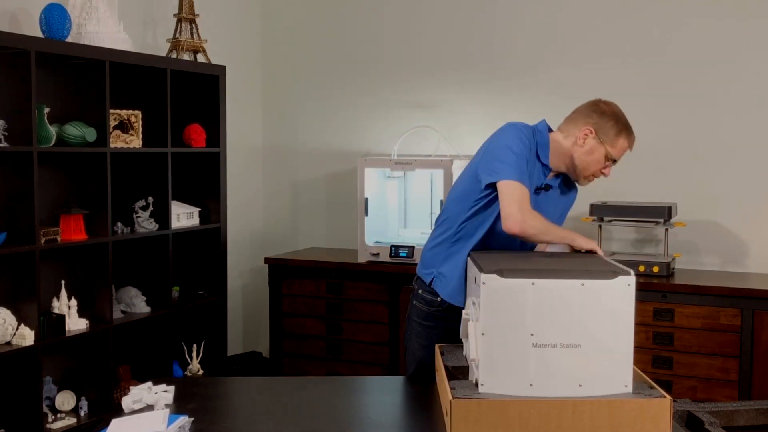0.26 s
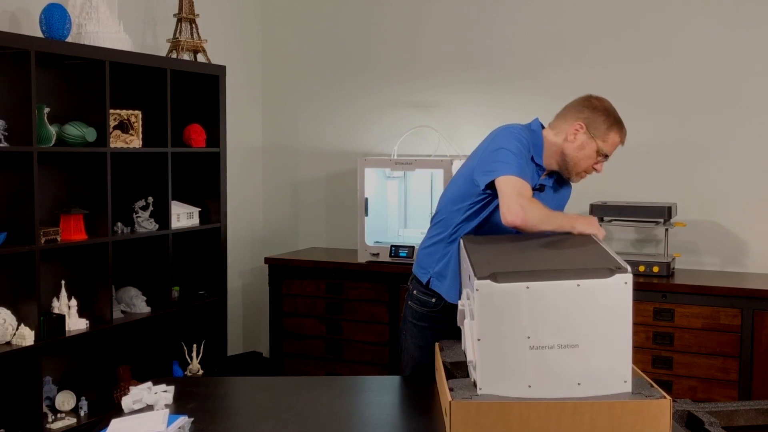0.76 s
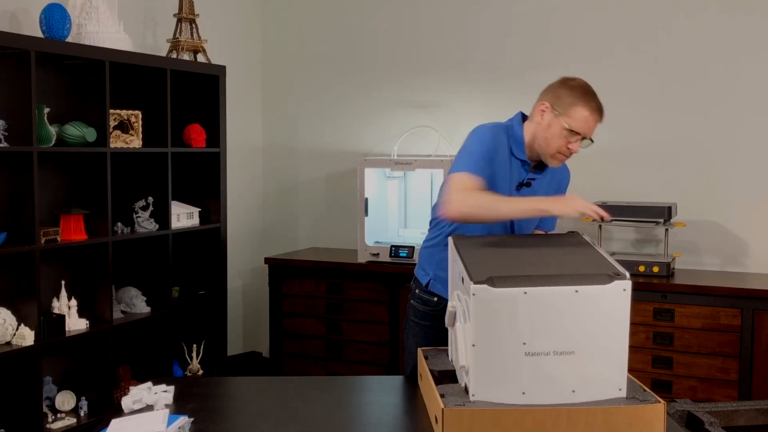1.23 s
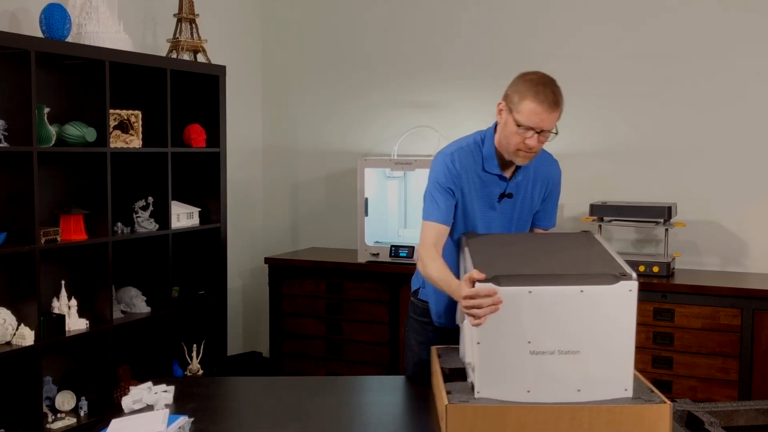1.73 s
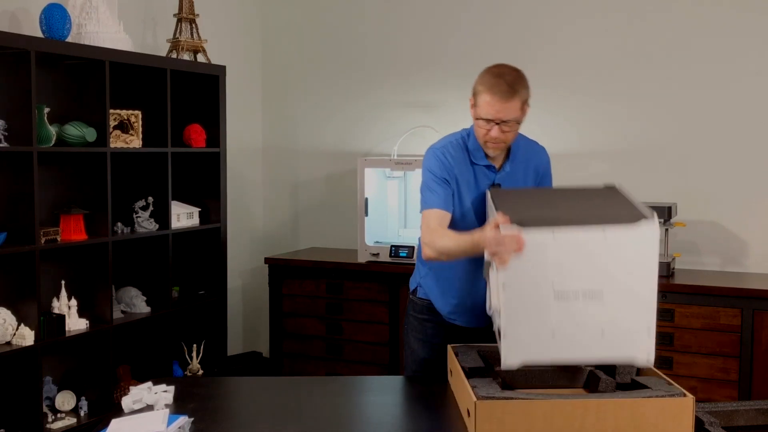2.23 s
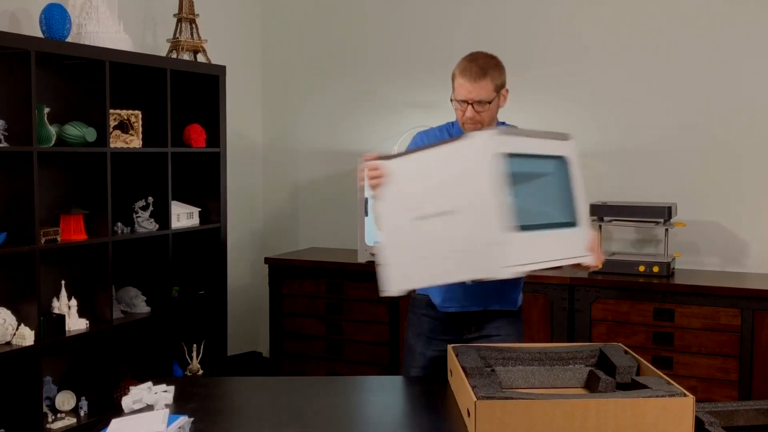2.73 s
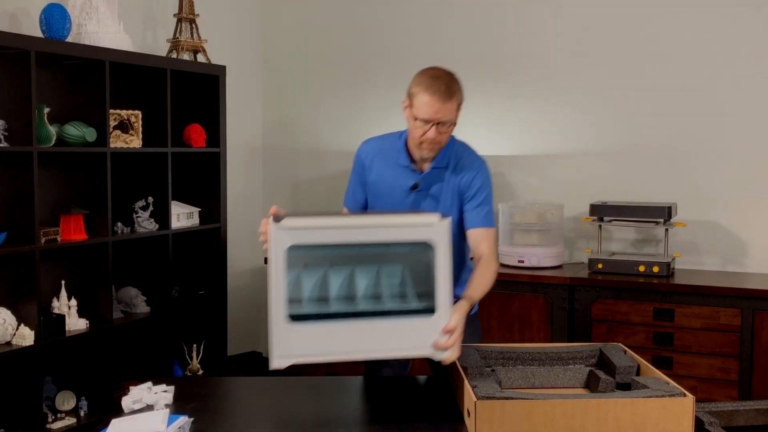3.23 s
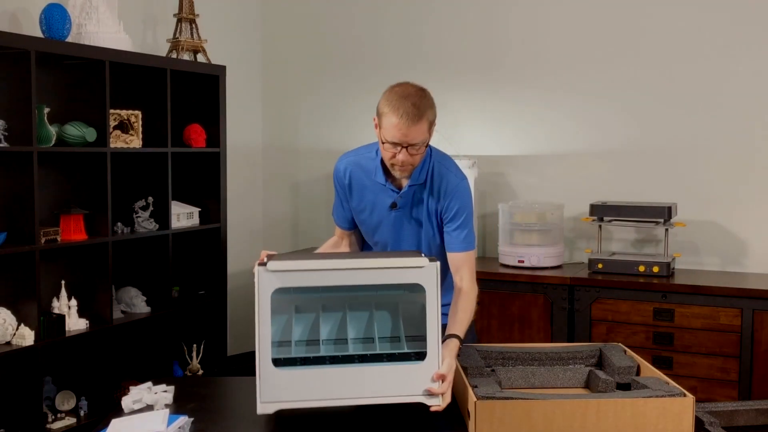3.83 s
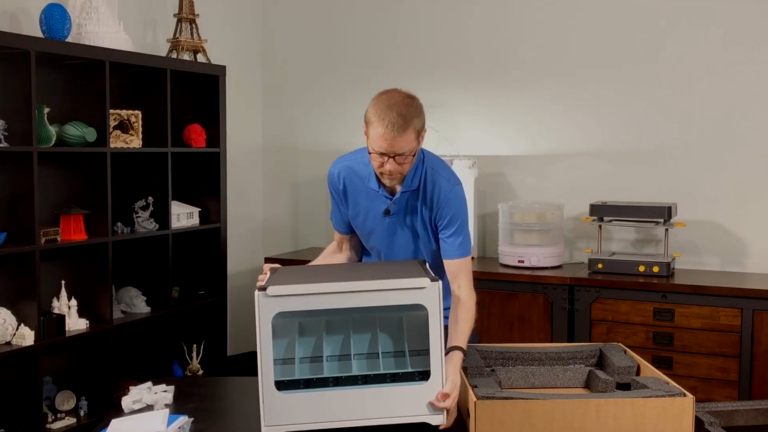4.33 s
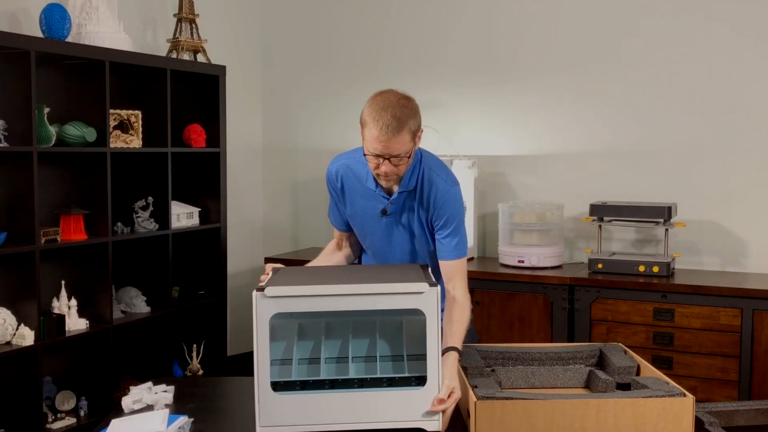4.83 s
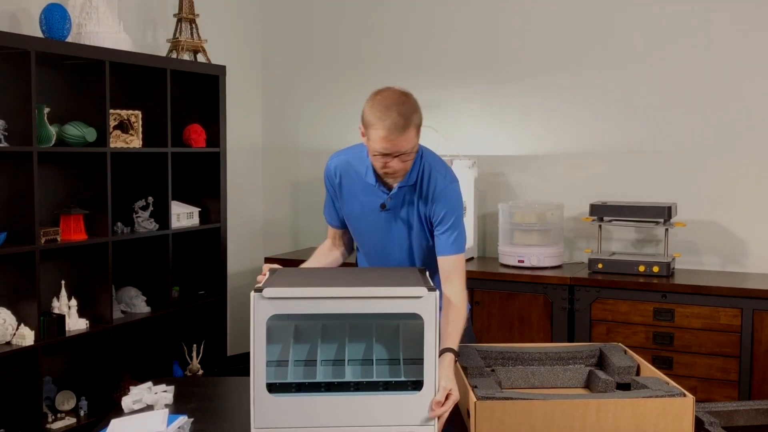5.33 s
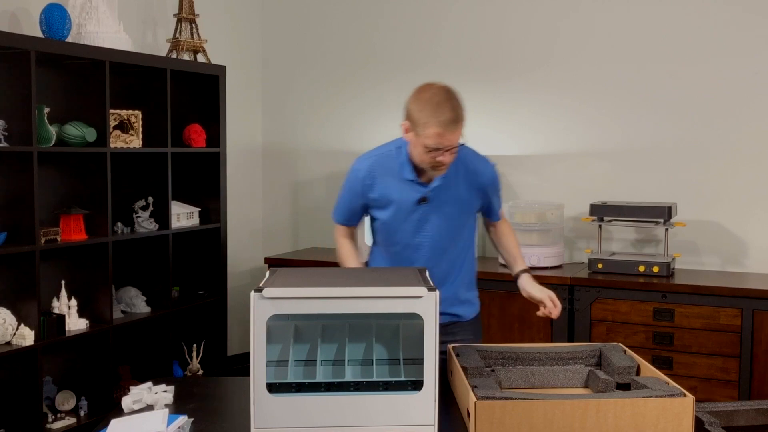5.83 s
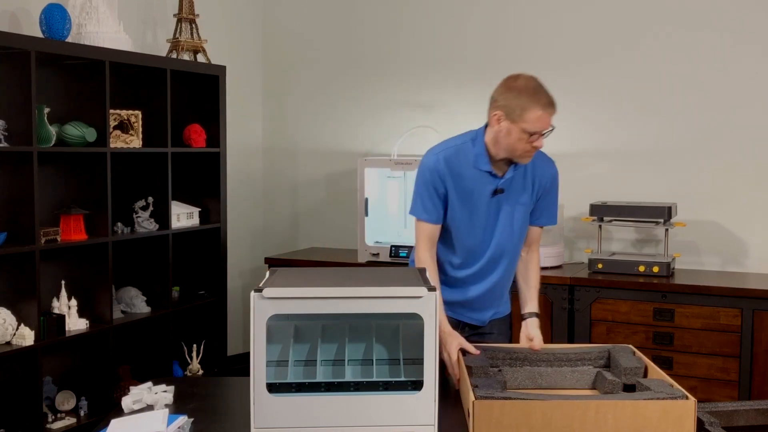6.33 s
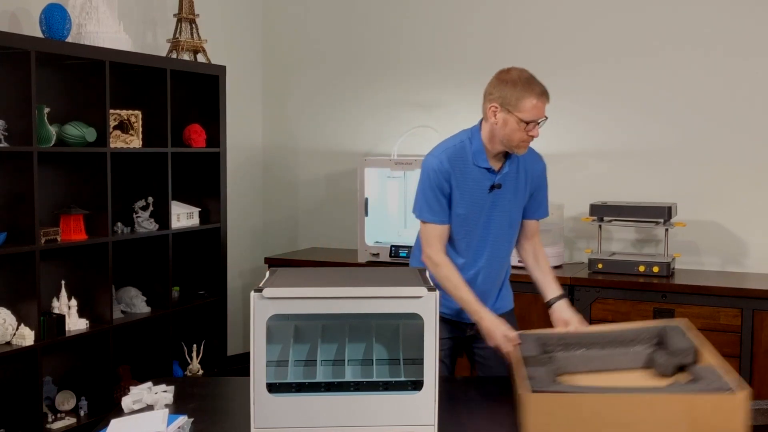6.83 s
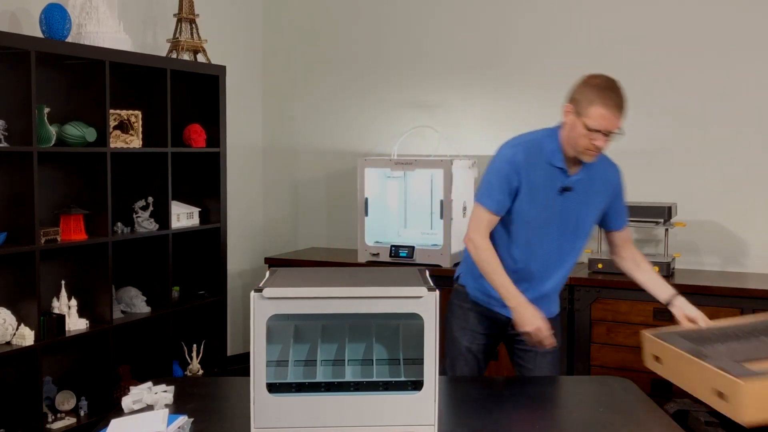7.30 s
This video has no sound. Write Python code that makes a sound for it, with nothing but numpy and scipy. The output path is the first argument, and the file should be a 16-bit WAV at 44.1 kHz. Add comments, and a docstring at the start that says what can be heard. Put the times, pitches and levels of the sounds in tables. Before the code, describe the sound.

For the first 1.5 seconds a hand sweeps over the lid of a heavy plastic and metal cabinet, with a few dry snaps. From about 1.7 seconds the cabinet slides out of foam packing, coming free with soft knocks and a deep microphone bump at 2.3. It scrapes the cardboard rim with a short squeak at 2.6, followed by a sharp click. Cloth rustles and the shirt microphone rumbles as it is carried. At 4.3 seconds it lands on a table with a hollow thump and rocks briefly; after a short slide, a sharper, louder thump follows at 5. Clothing rustles again. From 6.1 to 7 seconds the empty carton is dragged across the table with light taps and crisp snaps, then put down with a hollow knock at 7.5. The room is small and quiet, and the sound is close, with a slight fluttering echo.

```python
"""A heavy plastic and metal cabinet is unpacked in a small room, heard from a microphone on a shirt.
First a hand sweeps the lid; then the cabinet slides out of its foam and scrapes the carton's rim, all
by stick-slip friction. It is carried over and set on a table in two steps, whose impacts excite the
modes of its panels. Last, the hollow carton is dragged off and put down. Throughout, the shirt shakes
the microphone into a rumble, and the echoes of a hum filter add a short flutter."""
import sys
import numpy as np
from scipy import signal
from scipy.fft import rfft, irfft, next_fast_len
from scipy.io import wavfile
from scipy.ndimage import uniform_filter1d

SR = 44100
rng = np.random.default_rng(int(sys.argv[2]) if len(sys.argv) > 2 else 0)


def dump(signal):
    """Clip the signal to [-1, 1] and save it as 16-bit WAV at the path in sys.argv[1]."""
    limited = np.clip(np.atleast_2d(signal).T, -1, 1)
    pcm = np.round(limited * 32767).astype(np.int16)
    wavfile.write(sys.argv[1], SR, pcm)


N = 333306
T = np.arange(N) / SR

# Blows as the cabinet comes free, lands and rocks. Each row: start in seconds, level in dB,
# contact cut-off in Hz, relative levels of dense ringing and of table boom in dB.
CABINET_BLOWS = [(2.284, -25, 1000, -2, -22), (2.326, -26.5, 1000, 2, -30), (2.992, -36.5, 1800, 1.5, -33),
                 (3.055, -38, 1500, -12, -30), (4.341, -8.5, 1300, -2, -6), (4.378, -26.5, 700, 0, 6),
                 (4.415, -23, 1100, 9, -12), (4.508, -12, 380, -0.5, -11), (4.55, -21, 220, 5.5, 2.5),
                 (4.593, -23, 304, 4, 5.5), (5.012, -0.5, 5950, -0.5, -22), (5.055, -14.5, 2480, 7.5, -7),
                 (5.124, -7.5, 252, -3.5, -7), (5.165, -14, 147, -11, -13)]
# Modes of the cabinet and the empty carton. Each row: frequency in Hz, level in dB, T60 in seconds.
PANEL_MODES = [(108.4, -7, 0.51), (142.7, -19, 0.33), (182.6, -17, 1), (214.7, -11.5, 0.18),
               (290, -25, 0.38), (314, -22, 0.75), (354.5, -11, 0.28), (390, -23.5, .3), (426, -23, 0.16),
               (450, -27, 0.19), (560, -24.5, 0.24), (632.5, -26.5, 0.26), (678, -11, 0.25),
               (799, -11.5, 0.1), (1002, -22.5, 0.4), (1190, -22.5, 0.44), (1460, -29, 0.2)]
CARTON_MODES = [(100.5, -23, 0.22), (164.6, -17, 0.21), (201, -20.5, 0.48), (297, -17.5, 0.102),
                (377, -11, 0.056), (552, -7, 0.026), (569, -21, 0.24), (630, -10.5, 0.016),
                (770, -18, 0.053), (850, -16.5, 0.032)]
# Decay of the cabinet's and room's overlapping modes. Each row: frequency in Hz, T60 in seconds.
DENSE_T60 = [(50, 0.46), (200, 0.52), (500, 0.49), (2000, 0.5), (6000, 0.58), (14000, 0.38)]
# Taps on the carton. Each row: start in seconds, level in dB.
CARTON_TAPS = [(2.221, -30), (6.134, -31), (6.274, -30.5), (6.31, -34.5), (7.011, -34), (7.385, -34),
               (7.5051, -13), (7.522, -31)]

# Sliding strokes. Each row: time of full speed, attack, hold and release in seconds,
# level of the panel's drone in dB, level of the surface grit in dB.
HAND_STROKES = [(0.0, 0.15, 0.23, .3, -65.5, -70.5), (0.33, 0.14, 0.12, 0.054, -61, -63),
                (0.497, 0.11, 0.375, 0.11, -50.5, -52), (0.878, 0.027, 0.28, 0.27, -46, -43.5),
                (1.475, 0.02, 0.024, 0.18, -60.5, -84)]
FOAM_STROKES = [(1.74, 0.28, .4, 0.26, -52, -45), (1.97, 0.18, 0.11, 0.29, -54.5, -49)]
FEET_STROKES = [(4.88, 0.13, .13, 0.026, -49, -62), (4.96, 0.18, 0.044, 0.025, -49.5, -53.5)]   # the cabinet's feet, before the second step
CARTON_STROKES = [(6.097, .015, 0.23, 0.14, -63, -58), (6.28, 0.17, .13, 0.16, -49.5, -47),
                  (6.48, 0.089, 0.18, .25, -51.5, -43.5), (6.64, 0.39, 0.3, 0.24, -54, -47),
                  (6.79, 0.12, 0.029, 0.081, -42.5, -40), (7.014, 0.0092, 0.0046, 0.065, -44.5, -54)]   # gripped, dragged, pulled faster, tipped over the edge, let slip
SHIRT_STROKES = [(2.76, 0.036, 0.077, 0.41, -62.5, -56.5), (3.005, .015, 0.018, 0.15, -48.5, -73),
                 (3.378, 0.022, 0.0086, .15, -60, -57), (3.88, .1, 0.16, 0.091, -72.5, -69.5),
                 (4.09, .04, 0.016, 0.058, -64.5, -74), (5.432, 0.014, 0.023, 0.23, -55, -53.5),
                 (5.55, 0.059, 0.023, 0.41, -72, -58.5), (5.95, .12, 0.017, .07, -64.5, -69),
                 (7.44, 0.12, 0.15, .1, -59, -61)]

# Noise spectra. Each row: frequency in Hz, relative spectral density in dB.
DENSE_SPECTRUM = [(30, -7), (70, 5.5), (130, 3.5), (300, -0.5), (480, -7), (800, -11.5), (1500, -15.5),
                  (2300, -17.5), (3200, -22.5), (5000, -26.5), (7700, -31), (10000, -39.5), (16000, -52.5)]   # overlapping modes
HAND_SPECTRUM = [(110, -2), (180, -2.5), (230, -10), (299, -4.5), (334, -1.5), (419, -3), (566, -4.5),
                 (750, -7), (957, -7.5), (1270, -17.5), (3240, -13.5), (8450, -18.5), (13500, -29),
                 (16000, -35)]   # hand on lid
FOAM_SPECTRUM = [(110, -45), (180, 6), (209, -3), (443, 7), (736, -2.5), (808, -0.5), (1050, -6),
                 (1270, -7.5), (1530, -11), (6870, -12.5), (13300, -23.5), (16000, -39)]   # foam on cabinet
FEET_SPECTRUM = [(88, -22.5), (150, -1), (197, -11), (259, -4), (303, -5.5), (612, -7), (689, -6),
                 (1290, -14), (4410, -13), (16000, -37)]   # feet on table
CARTON_SPECTRUM = [(82, -36), (140, -29), (200, -2.5), (244, -6.5), (377, -1.5), (469, -2), (770, -1),
                   (921, -7.5), (1170, -11), (1570, -8), (2970, -7), (5070, -4), (9370, -7.5),
                   (16000, -22.5)]   # carton on table
SHIRT_SPECTRUM = [(120, -36), (200, -0.5), (416, -5), (558, -6), (1000, -14.5), (1140, -16.5), (3560, -7),
                  (5520, -5.5), (10100, -9), (16000, -25)]   # cloth on arms and cabinet
SCRAPE_SPECTRUM = [(53, -37.5), (90, 7.5), (192, -9), (233, 0), (300, -6), (348, -8), (395, -6.5),
                   (744, -3.5), (862, -7.5), (1130, -7), (1690, -15.5), (2230, -12.5), (2870, -20),
                   (5190, -20), (14000, -60)]   # cabinet on the carton's rim
RUMBLE_SPECTRUM = [(8.2, -22), (14, 3.5), (27, 2), (39, -7), (52, -9), (90, -33.5), (123, -54),
                   (260, -61.5), (340, -71), (570, -120)]   # shaken microphone
AIR_SPECTRUM = [(15, -25), (25, 3), (49, -4), (123, -15), (326, -28.5), (575, -40.5), (695, -38.5),
                (1290, -42.5), (6740, -39), (9570, -41.5), (14800, -48.5), (16000, -49)]   # quiet room

# Card, foam and cloth singing as they slip. Each row: peak time and half-length in seconds,
# frequency and bandwidth in Hz, level in dB.
SQUEAKS = [(0.506, 0.044, 630, 150, -48.5), (0.901, 0.021, 3350, 1600, -40),
           (1.198, 0.012, 2850, 900, -42.5), (1.84, .05, 8000, 2500, -52),
           (2.099, 0.049, 5200, 3540, -42.5), (2.557, 0.033, 950, 600, -32), (2.586, .016, 1160, 60, -22.5),
           (2.86, 0.039, 5400, 1400, -54.5), (6.789, 0.017, 778, 119, -38.5),
           (6.855, 0.055, 8400, 6600, -40)]
# Dry snaps of plastic and card. Each row: start in seconds, peak level in dB,
# frequency and bandwidth in Hz, T60 in seconds.
SNAPS = [(0.4963, -22.5, 4330, 8700, .03), (0.7672, -31, 7000, 12000, 0.048),
         (.8755, -21, 4000, 6040, 0.047), (0.899, -32, 3450, 4500, 0.051), (1.024, -23, 6000, 9000, .007),
         (1.3207, -29.5, 4400, 7500, 0.045), (1.514, -28, 6000, 12300, .005),
         (2.286, -24.5, 1300, 1200, 0.019), (2.3273, -28, 1160, 1190, 0.049),
         (2.327, -26, 3940, 11900, .006), (2.596, -21, 2800, 3000, .035), (2.9955, -34, 1990, 3000, .03),
         (3.023, -35, 4450, 7000, .013), (3.0554, -40.5, 2270, 2500, 0.033), (3.261, -49, 1670, 810, 0.026),
         (3.3736, -41, 6900, 10000, 0.035), (5.0256, -16, 6560, 11900, .005), (5.43, -38, 6460, 10100, .05),
         (6.09, -44, 10000, 10000, 0.37), (6.818, -18.5, 6000, 12000, .035),
         (6.945, -16.5, 4400, 11800, 0.014), (7.011, -26, 6000, 14000, 0.0051),
         (7.5158, -26, 2000, 7000, 0.68)]
# Clicks of a small hard part of the cabinet. Each row: start in seconds, peak level in dB.
CLICKS = [(2.7062, -15), (4.6637, -29)]
# Resonances of that part. Each row: frequency and bandwidth in Hz, relative level in dB.
CLICK_MODES = [(5570, 2300, 6.5), (7800, 2100, -2)]
# Body movements that tug the shirt. Each row: peak time and half-length in seconds, level in dB.
SWAYS = [(0.057, 0.11, -36), (0.85, 0.62, -49), (1.49, 0.24, -38.5), (2.507, 0.24, -37), (2.94, 0.17, -20),
         (3.227, 0.025, -18), (3.374, 0.074, -19), (3.676, 0.086, -24), (3.868, .04, -30.5),
         (4.045, 0.12, -44), (5.59, .06, -37), (5.94, 0.14, -31), (6.253, 0.12, -29.5), (6.576, 0.032, -36),
         (7.277, 0.18, -36.5)]
# Soft bumps on the microphone. Each row: start in seconds, level in dB, frequency in Hz, T60 in seconds.
BUMPS = [(0.088, -32, 66.5, 0.17), (1.392, -21.5, 92, 0.092), (1.62, -25, 63, 0.14),
         (2.285, -2.5, 39.6, 0.18), (5.014, -25, 36.4, 0.65), (5.553, -24, 67.5, 0.29),
         (6.806, -33, 105, 0.19)]


def cabinet_knocks():
    """An impact excites the modes of panels and table; the softer the contact, the less treble."""
    out, t = np.zeros(N), T[:SR]
    thud = np.sin(2 * np.pi * 440 * t) * (t / .0019) * np.exp(1 - t / .0013)
    for start, db, contact_hz, dense_db, boom_db in CABINET_BLOWS:
        panels = from_db(-9.5) * struck(PANEL_MODES, uneven_db=1.5)
        dense = from_db(dense_db - 11.5) * dense_ring()
        cabinet = filtered(panels + thud + dense, contact_hz, "low", order=1)
        table = from_db(boom_db) * boom(hz=142, t60=.11)
        add(out, start, from_db(db) * (cabinet + table))
    return out


def dense_ring():
    """Closely spaced modes overlap into noise, each octave decaying at its own rate."""
    spectrum = rfft(coloured(rng.standard_normal(SR), DENSE_SPECTRUM))
    out, hz = 0, np.arange(SR // 2 + 1)
    for centre_hz in 16 * 2. ** np.arange(11):
        octave = np.maximum(1 - abs(np.log2((hz + 1) / centre_hz)), 0)
        decay = from_db(-60 * T[:SR] / at_hz(DENSE_T60, centre_hz))
        out = out + irfft(spectrum * octave, SR) * decay
    return out


def rubbing():
    """Sliding friction: each pair of surfaces has its own roughness and spectrum."""
    hand = rub(HAND_STROKES, HAND_SPECTRUM, friction(2000, 3, .95), judder_db=1.6, bite_db=3)
    foam = rub(FOAM_STROKES, FOAM_SPECTRUM, friction(7300, 5.5, 1.4), judder_db=.6, bite_db=-2)
    feet = rub(FEET_STROKES, FEET_SPECTRUM, friction(6600, .5, 1.2), judder_db=1, bite_db=4.5)
    carton = rub(CARTON_STROKES, CARTON_SPECTRUM, friction(1800, 3, .9), judder_db=2.3, bite_db=.1)
    shirt = rub(SHIRT_STROKES, SHIRT_SPECTRUM, friction(1800, 3, 1.15), judder_db=2.5, bite_db=-.9)
    return hand + foam + feet + carton + shirt


def rub(strokes, spectrum, force, judder_db, bite_db):
    """Friction drives a low drone in the panel and radiates high grit; both grow with sliding speed."""
    drone, grit = 0, 0
    bite_s, crossover_hz = .056, 1500
    for time, attack, hold, release, drone_db, grit_db in strokes:
        speed = envelope(time, attack, hold, release)
        grip_db = bite_db * swell(T - time - bite_s / 2, bite_s)   # grip changes on reaching full speed
        drone = np.hypot(drone, from_db(drone_db) * speed)   # strokes add in power
        grit = np.hypot(grit, from_db(grit_db + grip_db) * speed)
    noise = coloured(force, spectrum)
    low = rms_one(filtered(noise, crossover_hz, "low", order=4))
    high = rms_one(filtered(noise, crossover_hz, "high", order=4))
    return (drone * low + grit * high) * from_db(judder_db * drift(70))


def friction(slips_per_s, spread_db, smooth_gain):
    """Stick-slip motion gives random impulses of uneven size over the noise of smooth sliding."""
    slip_chance = slips_per_s * from_db(3 * drift(40)) / SR
    slips = (rng.random(N) < slip_chance) * rng.choice([-1, 1], N)
    sizes = from_db(spread_db * np.minimum(rng.exponential(1, N), 4))
    return rms_one(slips * sizes) + smooth_gain * rng.standard_normal(N)


def rim_scrape():
    """Growing friction forces the carton's rim into resonance until the cabinet comes free."""
    force = from_db(-26.5) * envelope(2.587, attack=.1, hold=.013, release=.012)
    drag = force * coloured(friction(slips_per_s=1800, spread_db=4.5, smooth_gain=.74), SCRAPE_SPECTRUM)
    return drag + from_db(2) * resonate(drag, hz=1182, width_hz=95)


def squeaks():
    """Stick-slip briefly favours one resonance: a squeak if narrow, a hiss if broad."""
    out, t = np.zeros(N), T[:SR // 2] - .25
    for time, half_length, hz, width_hz, db in SQUEAKS:
        band = rms_one(peaked(rng.standard_normal(len(t)), hz, width_hz))
        add(out, time + t[0], from_db(db) * swell(t, half_length) * band)
    return out


def carton_taps():
    """The heavily damped modes of the empty carton answer each tap with a hollow knock."""
    out = np.zeros(N)
    for start, db in CARTON_TAPS:
        add(out, start, from_db(db) * filtered(struck(CARTON_MODES, uneven_db=0), 1550, "low"))
    return out


def snaps_and_clicks():
    """An impulse excites one broad resonance in plastic or card, two narrower ones in the hard part."""
    out = np.zeros(N)
    for start, db, hz, width_hz, t60 in SNAPS:
        snap = peaked(crackle(t60), hz, width_hz)
        add(out, start, from_db(db) * snap / np.max(abs(snap)))
    for start, db in CLICKS:
        impulse = crackle(t60=.0071)
        ring = sum(from_db(level) * peaked(impulse, hz, width_hz) for hz, width_hz, level in CLICK_MODES)
        click = filtered(ring, 4600, "high", order=6)
        add(out, start, from_db(db) * click / np.max(abs(click)))
    return out


def microphone_rumble():
    """Structure-borne sound: body movements shake the microphone, and bumps set it swinging briefly."""
    stirring = from_db(-55)
    motion = stirring + sum(from_db(db) * swell(T - time, half_length) for time, half_length, db in SWAYS)
    shake = coloured(rng.standard_normal(N), RUMBLE_SPECTRUM)
    local_rms = np.sqrt(uniform_filter1d(shake ** 2, SR // 12) + .044)
    out = motion * shake / local_rms   # evened out, so the motion sets the level
    for start, db, hz, t60 in BUMPS:
        add(out, start, from_db(db) * boom(hz, t60))
    return out


def room(x, wet_db):
    """Reverberation: diffuse reflections arrive after a short gap and decay exponentially."""
    t, t60, gap_s = T[:SR], .5, .006
    tail = rng.standard_normal(SR) * from_db(-60 * t / t60) * (t > gap_s)
    tail = filtered(tail, 9000, "low", order=1)
    return x + from_db(wet_db) * signal.fftconvolve(x, tail / np.linalg.norm(tail))[:N]


def room_air():
    """The ambient noise floor is steady and strongest in the bass."""
    return from_db(-51) * coloured(rng.standard_normal(N), AIR_SPECTRUM)


def struck(modes, uneven_db):
    """Free vibration is a sum of damped sinusoids, their levels scattered by uneven_db at each blow."""
    t, scatter_db = T[:SR], rng.normal(0, uneven_db, len(modes))
    return sum((-1) ** k * from_db(db + scatter_db[k] - 60 * t / t60) * np.sin(2 * np.pi * hz * t)
               for k, (hz, db, t60) in enumerate(modes))


def boom(hz, t60):
    """A single damped mode, softly struck."""
    t = T[:SR]
    return from_db(-60 * t / t60) * np.sin(2 * np.pi * hz * t) * (1 - np.exp(-t / .0012))


def crackle(t60):
    """Broadband excitation: an impulse, then decaying noise."""
    t = T[:SR // 5]
    return 7 * (t == 0) + rng.standard_normal(len(t)) * from_db(-60 * t / t60)


def envelope(time, attack, hold, release):
    """Exponential rise to 1 at the given time, hold and fall; attack and release each span 20 dB."""
    before = np.maximum(time - T, 0) / attack
    after = np.maximum(T - time - hold, 0) / release
    return from_db(-20 * np.minimum(before + after, 10))


def swell(t, half_length):
    """A Gaussian bell, down to 1/e at half_length either side of t = 0."""
    return np.exp(-np.minimum((t / half_length) ** 2, 20))


def drift(per_s):
    """Random modulation: straight lines join per_s Gaussian values a second."""
    return np.interp(T * per_s, np.arange(4096), rng.standard_normal(4096))


def resonate(x, hz, width_hz):
    """A two-pole resonator with unit gain at its peak."""
    radius = np.exp(-np.pi * width_hz / SR)
    feedback = [1, -2 * radius * np.cos(2 * np.pi * hz / SR), radius ** 2]
    return signal.lfilter(np.array([1, 0, -1]) * (1 - radius ** 2) / 2, feedback, x)


def peaked(x, hz, width_hz):
    """Two resonators in cascade give steeper skirts."""
    return resonate(resonate(x, hz, width_hz), hz, width_hz)


def coloured(x, spectrum):
    """Spectral shaping to unit rms, with a steep roll-off past the table's ends."""
    size = next_fast_len(len(x))
    hz = np.arange(size // 2 + 1) * SR / size
    roll_off = np.minimum(hz / spectrum[0][0], 1) ** 2 * np.minimum(spectrum[-1][0] / (hz + 1), 1) ** 4
    gain = from_db(at_hz(spectrum, hz)) * roll_off
    return rms_one(irfft(rfft(x, size) * gain, size)[:len(x)])


def filtered(x, hz, kind, order=2):
    """A causal Butterworth filter."""
    return signal.sosfilt(signal.butter(order, hz, kind, fs=SR, output="sos"), x)


def at_hz(points, hz):
    """Interpolation on a log-frequency axis."""
    frequencies, values = np.transpose(points)
    return np.interp(np.log(np.maximum(hz, 1)), np.log(frequencies), values)


def from_db(db):
    """Decibels to amplitude ratio."""
    return 10 ** (np.asarray(db) / 20)


def rms_one(x):
    """Scaling to unit rms."""
    return x / np.sqrt(np.mean(x ** 2) + 1e-20)


def add(out, start_s, sound):
    """Superposition of a sound from start_s on."""
    start = int(start_s * SR)
    out[start:start + len(sound)] += sound[:max(N - start, 0)]


def scene():
    """The handling sounds superpose on the quiet of the room."""
    air = room_air()
    slipping = room(rim_scrape(), wet_db=-17) + squeaks()
    taps = room(carton_taps(), wet_db=-6.5)
    handling = rubbing() + slipping + taps + room(snaps_and_clicks(), wet_db=-13) + cabinet_knocks()
    return (handling + microphone_rumble() + air)[None]


def hum_filter(x, mains_hz, memory, depth):
    """Comb filtering: subtracting an average of past mains cycles leaves inverted echoes a cycle apart."""
    cycle = round(SR / mains_hz)
    hum = np.zeros((len(x), N + 2 * cycle))
    for i in range(0, N - cycle, cycle):
        hum[:, i + cycle:i + 2 * cycle] = memory * hum[:, i:i + cycle] + (1 - memory) * x[:, i:i + cycle]
    return x - depth * hum[:, :N]


def record(dry):
    """After the hum filter, soft saturation rounds the peaks and a steep low-pass limits the band."""
    ceiling, cutoff_hz = .95, 15900
    x = hum_filter(dry, mains_hz=60, memory=.48, depth=.9)
    rounded = x / (1 + (x / ceiling) ** 6) ** (1 / 6)
    return signal.sosfilt(signal.ellip(10, .2, 80, cutoff_hz, fs=SR, output="sos"), rounded)


dry = scene()
out = record(dry)
dump(out)
```